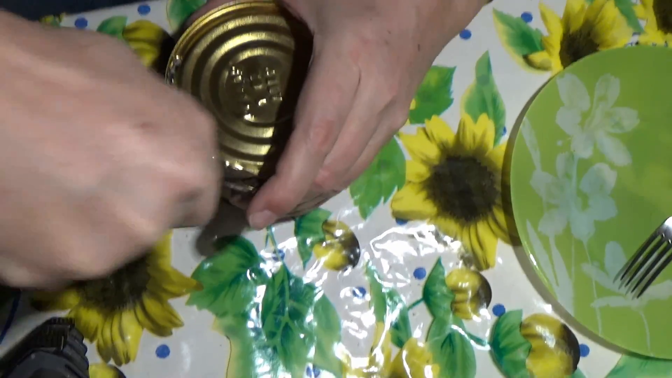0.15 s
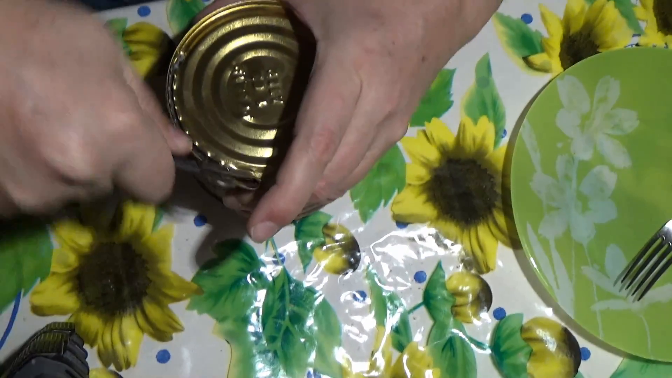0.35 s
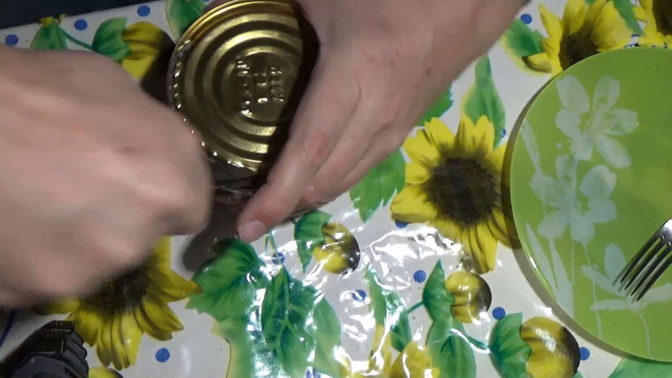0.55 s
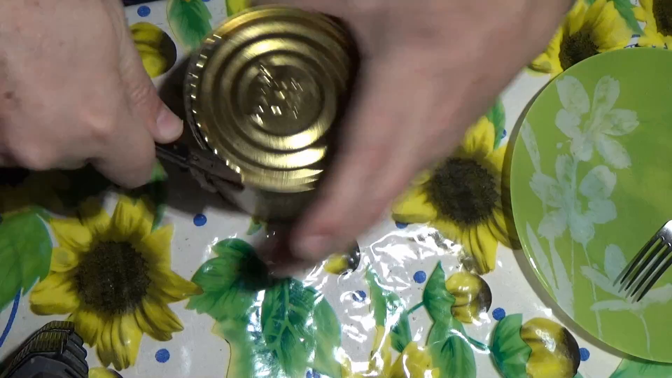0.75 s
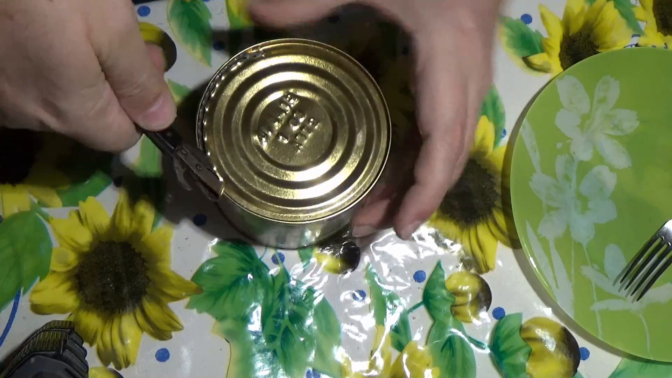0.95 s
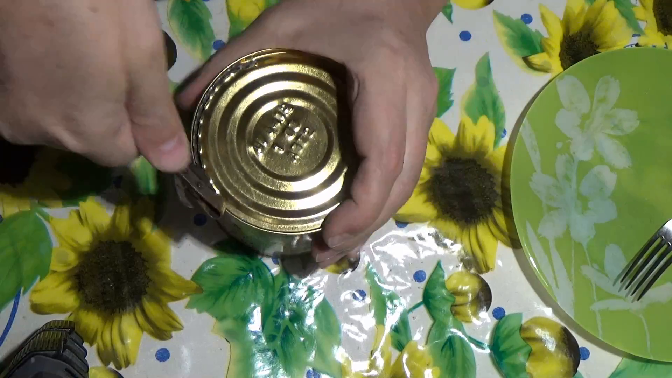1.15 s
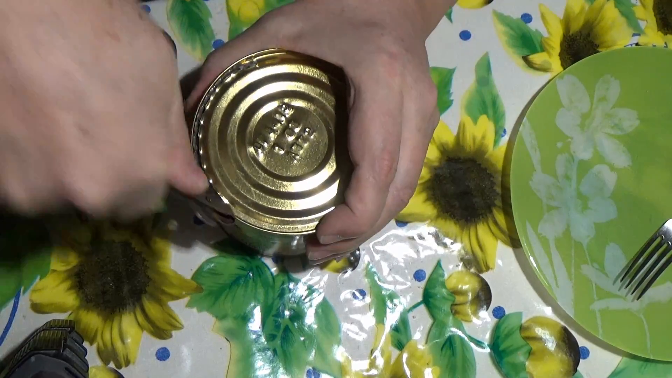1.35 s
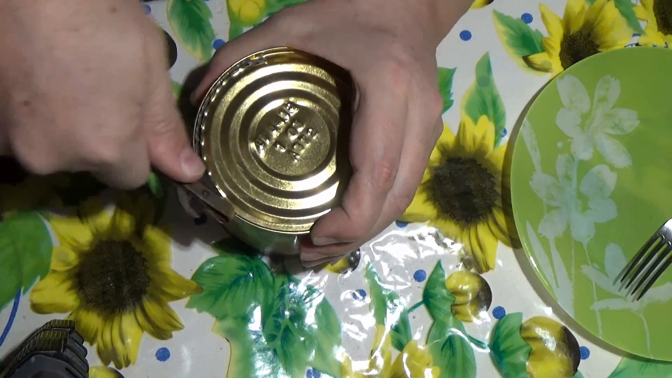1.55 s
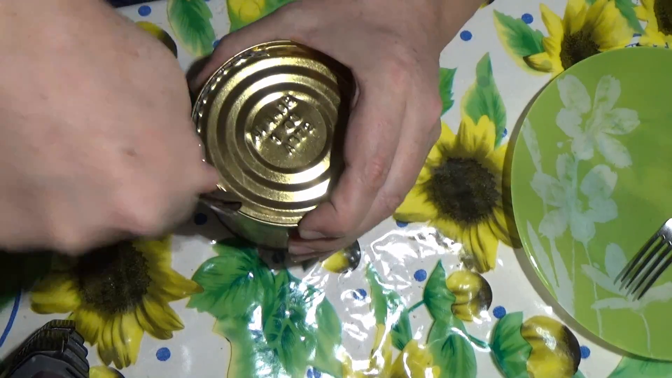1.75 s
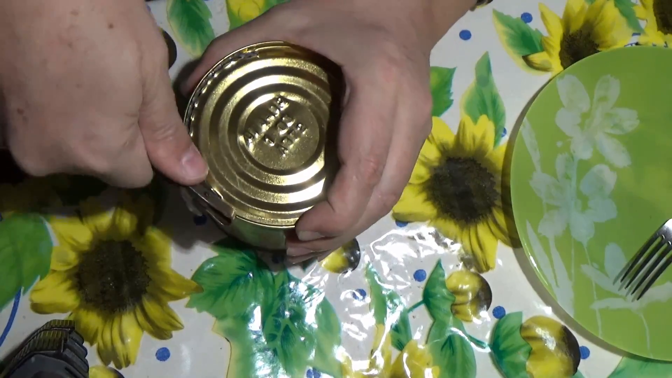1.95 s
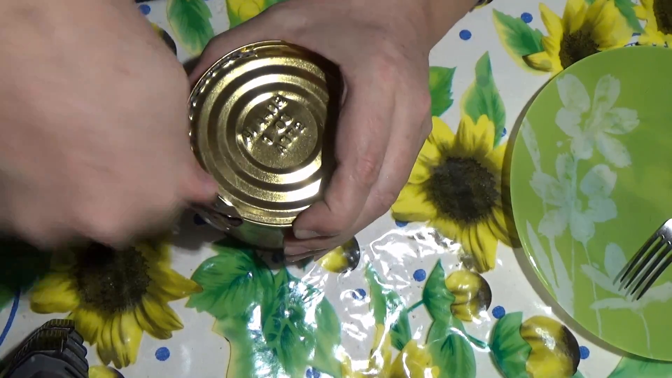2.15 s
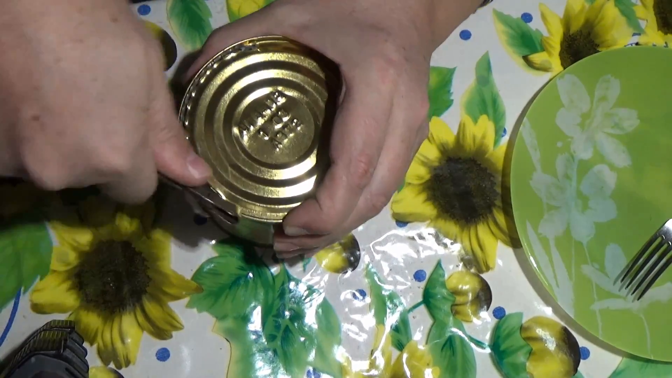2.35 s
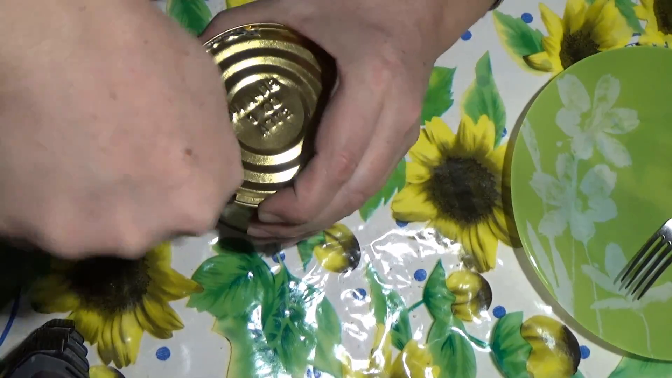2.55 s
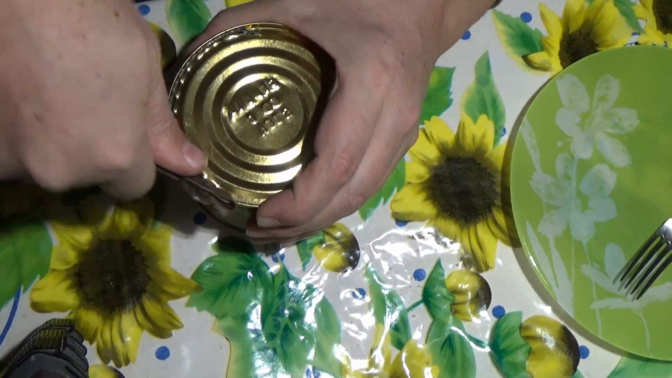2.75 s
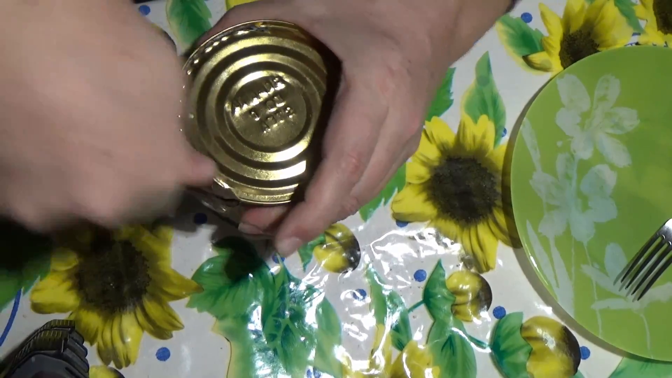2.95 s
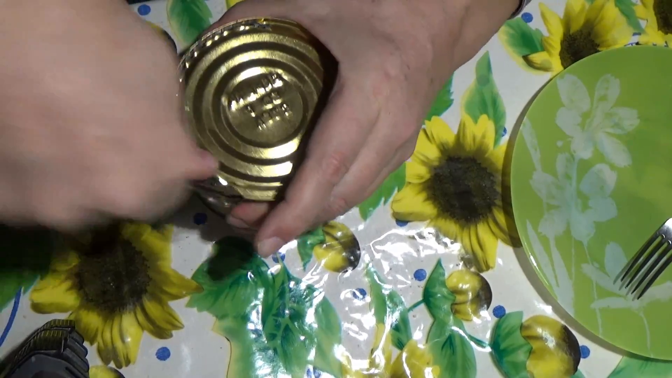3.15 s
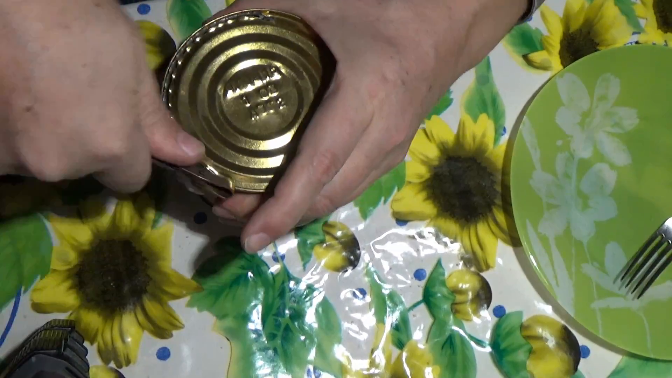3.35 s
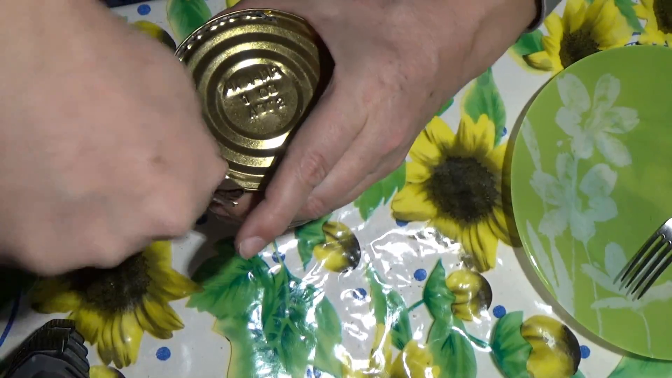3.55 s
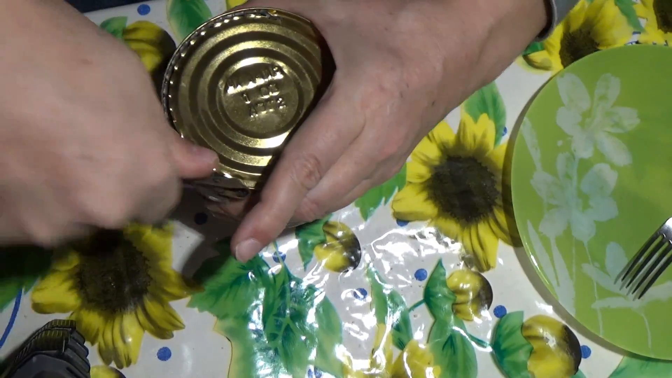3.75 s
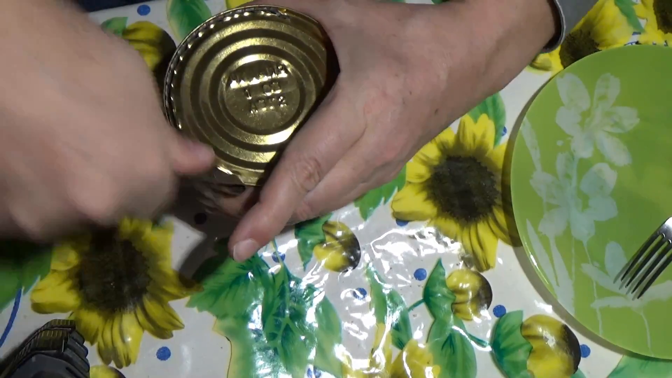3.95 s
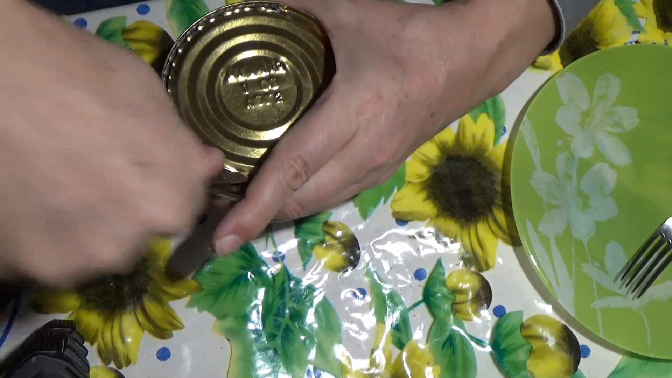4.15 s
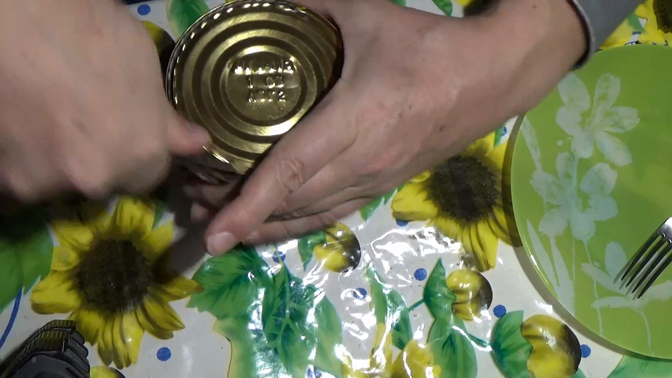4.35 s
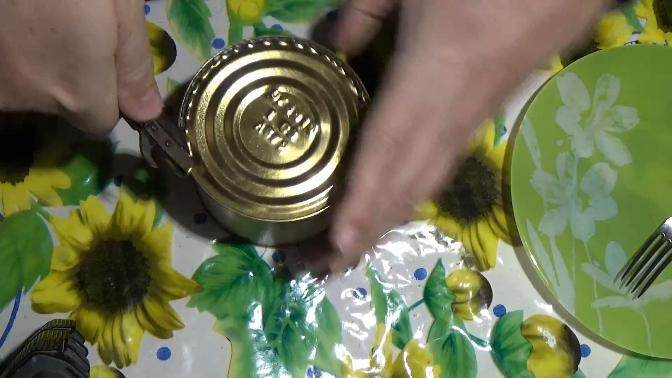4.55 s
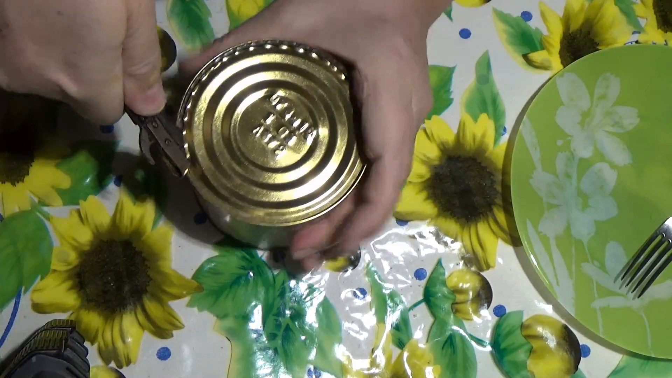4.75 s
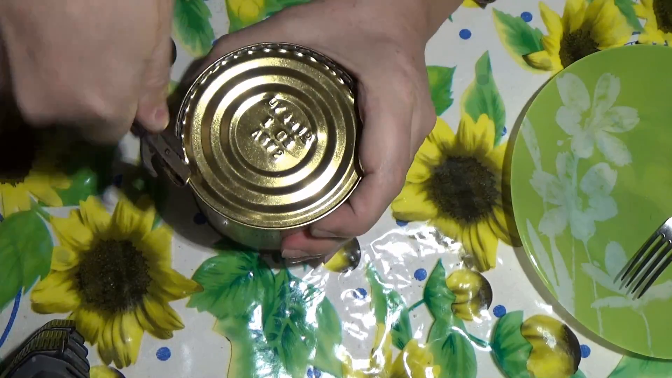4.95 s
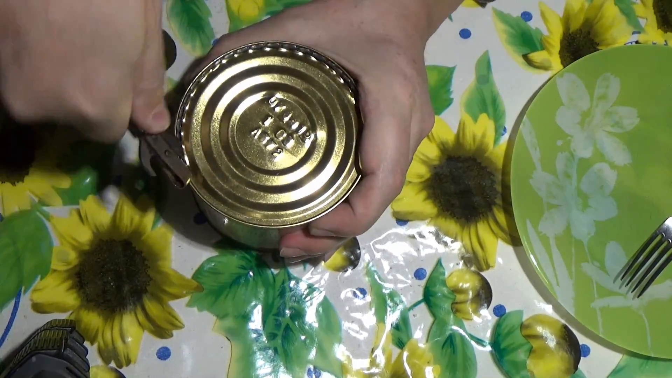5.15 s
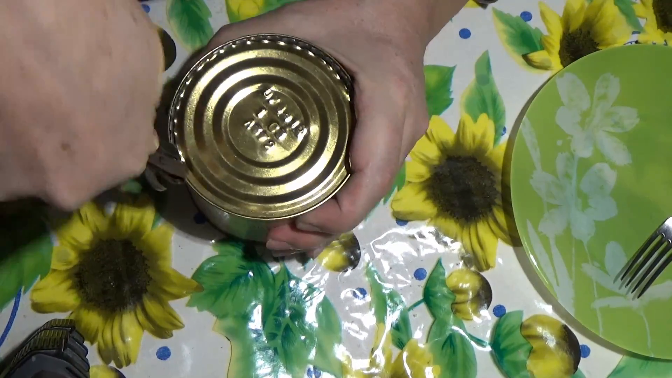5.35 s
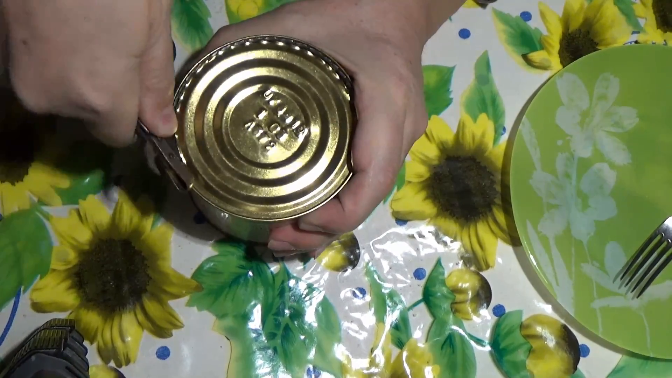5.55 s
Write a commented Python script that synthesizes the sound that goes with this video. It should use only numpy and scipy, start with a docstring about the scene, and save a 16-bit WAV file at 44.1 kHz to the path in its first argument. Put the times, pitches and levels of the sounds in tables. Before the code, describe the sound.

Heard very close in a quiet indoor room: gritty metallic strokes in uneven pairs, tearing forward and dragging back, each ringing the damped tin and shaking the table. Sharp clicks fall between them. Soft skin hiss marks two turns of the tin, the first followed by short low groans on the plastic cloth. More cutting follows, closing on a heavy crunching push and double jerk.

```python
"""A lever can opener works round a full tin on a table with a plastic cloth, heard close, almost in mono.
From the start, pushes tear the lid and shake the table; returns drag the blade along the rim.
Jerks, steel clicks and their pings fall between; after a few strokes the hand slides to turn the tin.
The tin then groans briefly on the cloth, and pushes and returns go on until the hand slides again.
More strokes follow, and a strong push with two hard jerks closes the scene over faint room noise."""
import sys
import numpy as np
from scipy import signal
from scipy.fft import rfft, irfft
from scipy.io import wavfile
from scipy.ndimage import uniform_filter1d

SR = 44100
rng = np.random.default_rng(int(sys.argv[2]) if len(sys.argv) > 2 else 0)


def store_pcm(level_fs):
    """Save levels as 16-bit WAV."""
    pcm = np.round(np.clip(level_fs, -1, 1) * 32767).astype(np.int16)
    wavfile.write(sys.argv[1], SR, np.atleast_2d(pcm).T)


N = 246959
TIME = np.arange(N) / SR
RING_TIME = TIME[:SR // 2]
STROKE_TIME = TIME[:SR * 3 // 5]

# Levels in these tables are relative: the functions below add their own gains.

# Room and microphone noise: [f/Hz, level/dB per Hz]
ROOM_NOISE = [(20, -28), (60, -22), (200, 5.5), (500, -10.5), (900, -1.5), (1600, -10), (2200, -11.5),
              (3000, -13.5), (6000, -12), (16000, -21)]
# Side sound against the middle: [f/Hz, level/dB]
STEREO_WIDTH = [(30, -20), (100, -23), (500, -23), (1800, -29), (5000, -24), (9000, -21), (15000, -17)]

# The hand slides while the tin is turned: [start t/s, swell t/s, hold t/s, fade t/s per 20 dB, level/dB]
HAND_SLIDES = [(0.744, 0.068, 0.12, 0.03, -42), (1.04, 0.12, 0.033, 0.5, -44.5),
               (4.405, 0.091, 0.095, 0.1, -42.5), (4.654, 0.12, 0.03, 0.3, -44.5)]
# Hiss of the sliding hand: [f/Hz, level/dB]
SLIDE_HISS = [(350, -50), (600, -4), (1490, -38), (1730, -28), (2310, -9), (2720, -8), (6030, 1),
              (12500, -4), (16000, -9.5)]

# The table frame: [f/Hz, level/dB per Hz]
FRAME_RUMBLE = [(15, -25), (35, -20), (80, -2.5), (115, 8), (170, -20), (400, -71)]
# The whole table takes a shove: [t/s, level/dB]
TABLE_SHOVES = [(.136, -39), (.655, -28), (1.764, -19.5), (1.895, -27), (2.679, -24), (3.206, -28.5),
                (5.5, -24.5)]
# The dull boom of a shove: [f/Hz, level/dB per Hz]
SHOVE_BOOM = [(20, -22), (55, -5.5), (120, 3), (220, -10), (600, -50)]
# The tin on the table top: [f/Hz, width f/Hz, level/dB]
TABLE_TONES = [(111.5, 12.6, -5.5), (181.7, 20, -0.5), (244.2, 24, 0), (304.4, 34, 2), (336, 30, -1.5)]
# The many weaker table tones: [f/Hz, level/dB per Hz]
TABLE_WEAK_TONES = [(30, -46), (70, -24), (110, -10), (145, -9.5), (230, 8.5), (380, -1), (550, -8.5),
                    (1000, -43)]
# The tin sticks and slips on the cloth: [start t/s, end t/s, start f/Hz, end f/Hz, level/dB]
CLOTH_GROANS = [(1.358, 1.439, 278, 222, -24.5), (1.434, 1.483, 236, 229, -32.5),
                (1.68, 1.738, 213.3, 245, -29.5)]

# The tin wall, shaken with the load: [f/Hz, width f/Hz, level/dB]
WALL_TONES = [(427, 76, -5), (587.5, 47, 1), (647, 70, -4.5), (718.5, 61, -2.5), (827, 12, -12.5),
              (882.2, 26, 2)]
# Two lid tones shift as the cut lengthens: [t/s, first f/Hz, level/dB, second f/Hz, level/dB]
LID_TONES = [(0, 1274, 2, 1530, -16), (1.8, 1252, 0.5, 1375, -5.5), (2.2, 1245, 0.5, 1520, -27),
             (2.6, 1163, 1.5, 1390, -32), (3.3, 1112, -2, 1398, -3.5), (3.9, 980, -58, 1435, 2.5),
             (5.6, 900, -50, 1397, 1)]
# Lid and rim: [f/Hz, width f/Hz, level/dB]
TIN_TONES = [(582.2, 27.6, 2), (700, 16, -14.5), (888.8, 25.3, 7), (949.4, 14.7, 2.5), (1048, 30, -4.5),
             (1157, 57, -1.5), (1380, 16.7, -25.5), (1681, 44, -6.5), (1866, 35.5, -5.5), (2004, 49, -0.5),
             (2123, 56, -9.5), (2260, 47, -7), (2400, 49, -6), (2629, 18, -6)]
# The many weaker tin tones: [f/Hz, level/dB per Hz]
TIN_WEAK_TONES = [(200, -40), (450, -3.5), (900, 1.5), (1300, 3.5), (1600, -15), (2200, 2), (2800, -11.5),
                  (4200, -14), (7000, -33)]
# The cut edge and the blade in it: [f/Hz, width f/Hz, level/dB]
EDGE_TONES = [(2210, 52, -9), (2440, 30, -14), (2750, 180, -19), (3027, 314, 10), (3427, 136, 11.5),
              (3960, 49, 12), (4730, 30, -32)]
# Bright crackle of the contact: [f/Hz, level/dB per Hz]
GRIT_CRACKLE = [(1000, 1), (2500, 2), (4000, 2), (6000, -0.5), (7200, -3), (10000, -5.5), (13000, -8),
                (16000, -22)]

# The steel blade and its hook: [f/Hz, width f/Hz, level/dB]
BLADE_TONES = [(1870, 220, -3), (2350, 300, 0), (3450, 420, -8), (4500, 700, -16), (5900, 600, -16)]
# Steel snapping against steel: [f/Hz, level/dB per Hz]
STEEL_SNAP = [(1000, -26), (2500, -9), (4000, 3), (5600, 4), (7200, -4.5), (10000, -3), (16000, -10.5)]
# The opener knocks on the rim:
# [t/s, peak level/dB, treble level/dB against the peak, tin ring level/dB, ping f/Hz]
RIM_CLICKS = [(0.084, -10.5, -33, -17.5, 2030), (0.419, -5.5, -21.5, -17.5, 2140),
              (0.56, -27.5, -18, -55, 5200), (1.031, -18, -16, -29.5, 2430), (1.322, -19, -24, -21, 2090),
              (2.464, -19, -29, -21, 2140), (2.584, -9.5, -27, -36, 2470), (2.825, -10, -27.5, -19.5, 2240),
              (3.151, -30, -6, -33, 2370), (3.191, -13.5, -21, -13.5, 2460), (3.53, -21, -3, -22.5, 2770),
              (3.767, -22.5, -12, -33, 2480), (3.923, -28.5, -18, -54, 5320), (4.102, -23, -28, -26, 2110),
              (4.149, -23.5, -27, -22, 2140), (4.524, -28, -12, -23, 2250), (4.646, -30.5, -4.5, -61, 4570),
              (4.675, -41, 2.5, -64, 5810), (4.815, -20, -1, -23, 2520), (4.95, -38.5, 2, -65, 10600)]
# The blade catches or the sheet gives way: [t/s, peak level/dB, table thump level/dB, treble level/dB]
BLADE_JERKS = [(0.134, -11.5, -45, -38), (0.647, -17, -23, -29), (0.691, -18, -40, -22),
               (0.709, -14, -28, -20), (1.207, -23.5, -35, -26.5), (1.267, -29, -26, -37),
               (1.357, -17.5, -33, -40), (1.684, -18, -45, -36), (1.764, -6.5, -24, -26.5),
               (1.771, -9.5, -36, -38), (1.889, -13, -42, -13.5), (1.9, -9, -45, -14),
               (2.119, -30, -37, -40.5), (2.18, -13.5, -42, -35), (2.505, -14, -39, -30),
               (2.515, -12.5, -36, -18.5), (2.672, -11.5, -19, -16), (2.685, -7, -27, -20),
               (3.505, -15, -47, -27), (4.818, -19.5, -31, -24), (5.326, -14, -42, -37),
               (5.495, -7.5, -11.5, -17), (5.506, -6, -23, -33)]
# The blade is levered through the lid: [start t/s, swell t/s, hold t/s, fade t/s per 20 dB,
# table load level/dB, rasp level/dB, grit level/dB, singing level/dB]
BLADE_PUSHES = [(-0.031, 0.027, 0.013, 0.07, -30.5, -28, -38, -41.5),
                (0.075, 0.011, 0.057, 0.07, -37.5, -34.5, -50, -53.5),
                (0.271, 0.035, 0.049, 0.08, -26.5, -29.5, -36.5, -32.5),
                (0.599, 0.095, 0.011, 0.0839, -35.0, -31, -37.5, -40.5),
                (1.138, 0.062, 0.0061, 0.05, -35.5, -36.5, -47, -55),
                (1.233, 0.026, 0.003, 0.22, -36.0, -46, -51, -55.5),
                (1.518, 0.043, 0.028, 0.095, -28.5, -30.0, -35.5, -43),
                (1.757, 0.007, 0.014, 0.08, -28.5, -17.5, -49, -35.5),
                (1.836, 0.024, 0.005, 0.03, -39, -31, -44.5, -55),
                (1.874, 0.018, 0.005, 0.07, -26.5, -21.5, -31.5, -33),
                (1.922, 0.023, 0.008, 0.01, -42.0, -35.5, -42, -49.0),
                (2.279, 0.071, 0.059, 0.01, -32.5, -27, -37.5, -38.5),
                (2.63, 0.066, 0.032, 0.114, -29, -26.5, -36.5, -33),
                (2.967, 0.063, 0.053, 0.07, -31, -28.5, -38.5, -39.5),
                (3.277, 0.071, 0.044, 0.08, -31, -29, -37.5, -38.5),
                (3.147, 0.0073, 0.028, 0.06, -44, -40, -48.5, -52),
                (3.446, 0.025, 0.016, 0.14, -44, -39.0, -44.0, -41),
                (3.618, 0.065, 0.036, 0.1, -28.5, -29.5, -38, -39.5),
                (3.954, 0.057, 0.037, 0.0637, -30.5, -27.5, -36.0, -43.5),
                (4.312, 0.034, 0.05, 0.06, -39.5, -34.5, -40.5, -42),
                (4.802, 0.017, 0.004, 0.08, -33, -31, -40, -52),
                (5.123, 0.042, 0.048, 0.07, -35.0, -33.0, -43.0, -42.0),
                (5.388, 0.016, 0.066, 0.15, -38.5, -43.5, -55.0, -53.0),
                (5.463, 0.048, 0.016, 0.16, -24.0, -25.0, -36.5, -31.5)]
# The blade slides back along the rim: [start t/s, swell t/s, hold t/s, fade t/s per 20 dB,
# table load level/dB, rasp level/dB, grit level/dB, singing level/dB]
BLADE_RETURNS = [(0.121, 0.008, 0.034, 0.0849, -32.5, -27.5, -38.5, -30),
                 (0.412, 0.011, 0.089, 0.09, -36.5, -30.5, -41, -47),
                 (1.34, 0.022, 0.013, 0.11, -31, -28.5, -39, -46),
                 (1.672, 0.032, 0.016, 0.09, -35, -26.5, -39.5, -39),
                 (2.158, 0.033, 0.04, 0.08, -37.5, -26, -38.5, -31),
                 (2.483, 0.042, 0.042, 0.04, -38, -22.5, -35.5, -30.5),
                 (2.819, 0.073, 0.016, 0.059, -44, -26.5, -39.0, -41),
                 (3.186, 0.0087, 0.037, 0.062, -41, -23.5, -36, -34.5),
                 (3.499, 0.0091, 0.046, 0.09, -44.5, -30.5, -40.0, -37.5),
                 (3.779, 0.019, 0.07, 0.0639, -50.0, -33.5, -42.5, -37.0),
                 (4.141, 0.061, 0.021, 0.05, -49.0, -31, -42.5, -39.0),
                 (4.521, 0.0042, 0.013, 0.03, -49.0, -38.5, -48, -49.5),
                 (4.988, 0.058, 0.02, 0.04, -44, -31.5, -45.5, -38),
                 (5.313, 0.017, 0.05, 0.056, -48.0, -27.5, -43.5, -37.0)]

# How far below full force each kind of movement sets in
PUSH_ENTRY_DB, RETURN_ENTRY_DB, SLIDE_ENTRY_DB = 22.5, 14.5, 15
# How a movement eases off while held
EASING_DB_PER_S = 26.5
# The light rub left after a movement: its relative level and its fall
LINGER_DB, LINGER_DB_PER_S = -13.5, 100
# The load outlasts the rasp, and the singing tone answers late
LOAD_OUTLASTS_S, SINGING_LAG_S = 0.016, 0.0088
# Grit needs pressure: it grows as this power of the force
GRIT_POWER = 1.11
# The frame rumbles with the load (relative level) and under the resting hands
RUMBLE_SHARE_DB, RESTING_DB = -17.5, -67
# A ping has one overtone: its frequency ratio and relative level
PING_OVERTONE, PING_OVERTONE_DB = 1.41, -4.5


def from_db(db):
    """Turn decibels into a gain."""
    return 10 ** (np.asarray(db) / 20)


def unit(response):
    """Scale a response to energy 1, so that it keeps the level of noise passing through."""
    return response / np.sqrt(np.sum(response ** 2) + 1e-20)


def through(force, response):
    """Let a force set off a response at every moment."""
    return signal.fftconvolve(force, response)[:N]


def colour(x, spectrum):
    """Weight each frequency by a curve drawn through the given points."""
    hz, db = np.transpose(spectrum)
    grid = np.maximum(np.fft.rfftfreq(len(x), 1 / SR), 1)
    curve_db = np.interp(np.log(grid), np.log(hz), db)
    return irfft(rfft(x) * from_db(curve_db), len(x))


def noise(spectrum):
    """Steady coloured noise, rms 1."""
    x = colour(rng.standard_normal(N), spectrum)
    return x / x.std()


def drift(rate_hz):
    """Slow random wandering, spread 1."""
    r = np.exp(-2 * np.pi * rate_hz / SR)
    x = signal.lfilter([1], [1, -2 * r, r * r], rng.standard_normal(N))
    return x / x.std()


def impulses(s, db):
    """Put one single-sample tap of the given level at each time."""
    out = np.zeros(N)
    places = np.clip(np.round(s * SR).astype(int), 0, N - 1)
    np.add.at(out, places, from_db(db))
    return out


def blows(s, db, chatter_s):
    """A hard contact is a first touch and a few milliseconds of chatter."""
    t = TIME[:SR // 60]
    bursts = rng.standard_normal((len(s), len(t))) * np.exp(-t / chatter_s)
    touch = signal.unit_impulse(len(t))
    out = np.zeros(N)
    for at, gain, burst in zip(np.round(s * SR).astype(int), from_db(db), bursts):
        out[at:at + len(t)] += gain * unit(unit(burst) + touch)
    return out


def modes(table):
    """Solid things ring in fading tones; the wider a tone, the sooner it dies."""
    t = RING_TIME
    ring = 0
    for k, (hz, width, db) in enumerate(table):
        sign = (-1) ** k
        ring = ring + sign * from_db(db) * width * np.exp(-np.pi * width * t) * np.cos(2 * np.pi * hz * t)
    return unit(ring)


def wash(spectrum, t60):
    """Many overlapping weak tones ring like fading noise, down 60 dB after t60 seconds."""
    return unit(noise(spectrum)[:len(RING_TIME)] * from_db(-60 * RING_TIME / t60))


def crack(spectrum):
    """Sound straight from the contact is a sharp pulse, with all its energy as early as possible."""
    count = len(RING_TIME)
    pulse = colour(signal.unit_impulse(count), spectrum)
    cepstrum = irfft(np.log(abs(rfft(pulse)) + 1e-9), count)
    # Keeping only the first half of the cepstrum makes the pulse start at once.
    return unit(irfft(np.exp(2 * rfft(cepstrum[:count // 2], count)), count))


def wandering(force, spectrum, t60, move_hz):
    """As the contact point moves, other weak tones take over: no two bites ring alike."""
    shares = np.array([drift(move_hz) for _ in range(6)])
    shares /= np.sqrt(np.sum(shares ** 2, axis=0))
    return sum(through(force * share, wash(spectrum, t60)) for share in shares)


def envelope(swell, hold, fade, entry_db):
    """A hand movement sets in softly, swells, eases off a little and dies away to a light rub."""
    t = STROKE_TIME
    rising_db = entry_db * np.clip(1 - t / swell, 0, 1) ** 2
    easing_db = EASING_DB_PER_S * np.clip(t - swell, 0, hold)
    after = np.clip(t - swell - hold, 0, 1)
    lifting_db = 20 * (after / .25) ** 4
    rub_db = LINGER_DB_PER_S * after - LINGER_DB + lifting_db
    fading_db = np.minimum(20 * after / fade, rub_db)
    return from_db(-rising_db - easing_db - fading_db)


def placed(shape, start):
    """Lay a movement's envelope into the scene at its start time."""
    return np.interp(TIME, start + STROKE_TIME, shape, left=0, right=0)


def background_noise():
    """The room and the microphone give a faint steady noise."""
    return from_db(-53.5) * noise(ROOM_NOISE)


def hand():
    """Skin sliding over tin and plastic cloth hisses softly."""
    gain = np.zeros(N)
    for start, swell, hold, fade, db in HAND_SLIDES:
        gain += placed(from_db(db) * envelope(swell, hold, fade, SLIDE_ENTRY_DB), start)
    return gain * noise(SLIDE_HISS) * from_db(-3.5 + 2.0 * drift(60))


def table_top(force, leaning):
    """The tin shakes the table under it; the frame rumbles with the load and booms when shoved."""
    ring = from_db(-2) * modes(TABLE_TONES) + from_db(-7.5) * crack(TABLE_WEAK_TONES)
    weak = from_db(-11) * wandering(force, TABLE_WEAK_TONES, t60=0.18, move_hz=3.3)
    rumble = (from_db(RUMBLE_SHARE_DB) * leaning + from_db(RESTING_DB)) * noise(FRAME_RUMBLE)
    s, db = np.transpose(TABLE_SHOVES)
    boom = through(impulses(s, db + 15.5), crack(SHOVE_BOOM))
    return through(force, ring) + weak + rumble + boom


def groans():
    """The tin slips on the cloth at a regular rate: a short low tone swells, glides and fades."""
    out = np.zeros(N)
    for start, end, start_hz, end_hz, db in CLOTH_GROANS:
        progress = np.clip((TIME - start) / (end - start), 0, 1)
        phase = 2 * np.pi * np.cumsum(start_hz + (end_hz - start_hz) * progress) / SR
        tone = np.sin(phase) + from_db(-20) * np.sin(3 * phase)
        out += from_db(db) * np.sin(np.pi * progress) * tone
    return out


def wall(load, rasp):
    """The tin wall answers only when the blade both bears down and rasps."""
    force = np.sign(rasp) * np.sqrt(abs(load * rasp))
    return from_db(-1.5) * through(force, modes(WALL_TONES))


def lid(force, width_hz):
    """The lid rings in two moving tones, often only one of them loud, retuned as more of it comes free."""
    s, *columns = np.transpose(LID_TONES)
    r = np.exp(-np.pi * width_hz / SR)
    out = 0
    for hz, db in zip(columns[::2], columns[1::2]):
        # A resonator that turns with the moving pitch.
        turn = np.exp(2j * np.pi * np.cumsum(np.interp(TIME, s, hz)) / SR)
        ring = turn * signal.lfilter([1], [1, -r], force / turn + 1e-18)
        out = out + from_db(np.interp(TIME, s, db)) * ring.real * np.sqrt(2 * (1 - r * r))
    return out


def tin(force):
    """Lid and rim ring briefly, damped by the contents and the hand."""
    ring = from_db(-2.8) * modes(TIN_TONES) + from_db(-11) * crack(TIN_WEAK_TONES)
    weak = from_db(-9) * wandering(force, TIN_WEAK_TONES, t60=.1, move_hz=4)
    return through(force, ring) + weak + from_db(-8.5) * lid(force, width_hz=35)


def singing(gain, hz, waver_hz, waver_db):
    """Friction keeps one tone near 510 Hz going; its pitch wavers with the grip, and its level wavers too."""
    phase = 2 * np.pi * np.cumsum(hz + waver_hz * drift(28.2)) / SR
    return gain * from_db(waver_db * drift(45)) * np.sqrt(2) * np.sin(phase)


def cut_edge(rasp, grit):
    """The torn edge rings as the blade rubs it, under the bright crackle of the contact."""
    rubbing = np.sign(rasp) * np.sqrt(abs(rasp * grit))
    ring = from_db(-7) * through(rubbing, modes(EDGE_TONES))
    direct = through(grit, crack(GRIT_CRACKLE))
    weak = wandering(grit, GRIT_CRACKLE, t60=0.053, move_hz=5.5)
    return ring + direct + weak


def pings():
    """Each point of contact has a short, dry steel ping of its own."""
    t, out = TIME[:SR // 20], np.zeros(N)
    fade = from_db(-60 * t / .018)
    for s, peak_db, _, _, hz in RIM_CLICKS:
        start, phase = round(s * SR), 2 * np.pi * hz * t
        tone = np.sin(phase) + from_db(PING_OVERTONE_DB) * np.sin(PING_OVERTONE * phase)
        out[start:start + len(t)] += from_db(peak_db) * fade * tone
    return out


def friction(per_s, spread_db, judder_db, judder_hz, smooth_db):
    """Tiny slips of uneven size, bunched by the judder of the blade, lie over a smooth rub."""
    happens = rng.random(N) < per_s / SR
    size_db = spread_db * np.minimum(rng.exponential(1, N), 3)
    slips = happens * rng.choice([-1, 1], N) * from_db(size_db)
    rub = from_db(smooth_db) * rng.standard_normal(N)
    force = (slips / slips.std() + rub) * from_db(judder_db * drift(judder_hz))
    # Even out the slower level changes, to a running rms of 1.
    return force / np.sqrt(uniform_filter1d(force ** 2, size=1024) + 1e-9)


def efforts(rows, entry_db):
    """The hand sets load, rasp, grit and singing over time; where strokes overlap, the stronger counts."""
    gains = np.zeros((4, N))
    for start, swell, hold, fade, load_db, rasp_db, grit_db, singing_db in rows:
        rubbing = envelope(swell, hold, fade, entry_db)
        bearing = envelope(swell, hold + LOAD_OUTLASTS_S, fade, entry_db)
        stroke = [placed(from_db(load_db) * bearing, start),
                  placed(from_db(rasp_db) * rubbing, start),
                  placed(from_db(grit_db) * rubbing ** GRIT_POWER, start),
                  placed(from_db(singing_db) * rubbing, start + SINGING_LAG_S)]
        gains = np.maximum(gains, stroke)
    return uniform_filter1d(gains, size=192, axis=1)


def stroke_forces(effort, slips, split_hz, softening):
    """A lightly loaded blade only skims the sheet: its rasp loses the lower notes."""
    load, rasp, grit, _ = effort
    bearing = np.clip((load + 1e-6) / (rasp + 1e-6), .03, 1.5) ** softening
    low = signal.sosfiltfilt(signal.butter(2, split_hz, fs=SR, output="sos"), slips)
    shaped = slips - low + from_db(2) * bearing * low
    on_table = from_db(-1.5) * load * slips
    on_tin = from_db(-0.21) * rasp * shaped
    on_edge = from_db(-0.06) * grit * slips
    return np.array([on_table, on_tin, on_edge])


def strokes(pushing, returning):
    """The working blade tears on a push and drags on a return, forcing table, tin and cut edge."""
    tear = friction(per_s=700, spread_db=3.5, judder_db=2.4, judder_hz=110, smooth_db=-8.5)
    drag = friction(per_s=1500, spread_db=3.4, judder_db=1.8, judder_hz=142, smooth_db=-5.5)
    push = stroke_forces(pushing, tear, split_hz=770, softening=0.24)
    back = stroke_forces(returning, drag, split_hz=1130, softening=0.4)
    return push + back


def opener():
    """Strokes, jerks and clicks drive the same tin; strokes and jerks shake the table, clicks ring the blade."""
    pushing = efforts(BLADE_PUSHES, PUSH_ENTRY_DB)
    returning = efforts(BLADE_RETURNS, RETURN_ENTRY_DB)
    leaning, _, _, bowing = pushing + returning
    load, rasp, grit = strokes(pushing, returning)

    s, peak_db, thump_db, treble_db = np.transpose(BLADE_JERKS)
    load = load + impulses(s, thump_db + 23)
    rasp = rasp + blows(s, peak_db + 16.5, chatter_s=0.0037)
    grit = grit + blows(s, treble_db + 13, chatter_s=0.0066)

    s, peak_db, bright_db, ring_db, _ = np.transpose(RIM_CLICKS)
    rasp = rasp + blows(s, ring_db + 16.5, chatter_s=0.0021)
    snap = through(blows(s, peak_db + bright_db + 21, chatter_s=0.0046), crack(STEEL_SNAP))
    blade = through(blows(s, peak_db + 4.5, chatter_s=0.0018), modes(BLADE_TONES))
    blade = blade + from_db(-10) * pings()

    body = table_top(load, leaning) + wall(load, rasp) + tin(rasp) + cut_edge(rasp, grit)
    song = singing(bowing, hz=508.7, waver_hz=7.84, waver_db=3.5)
    return body + snap + blade + song + groans()


def scene():
    """The work sounds from the middle; a faint room tail and a little width surround it."""
    near = opener() + hand()
    # Room tail: [f/Hz, level/dB]
    room = wash([(50, 16), (200, -11), (2000, -11), (6000, 13.5), (16000, -5)], t60=0.34)
    mid = near + from_db(-23) * through(near, room) + background_noise()
    spread = wandering(mid, [(50, 0), (16000, 0)], t60=.02, move_hz=5)
    side = colour(spread, STEREO_WIDTH)
    return np.array([mid + side, mid - side])


def record(dry):
    """The microphone thins the deep bass; the top is cut steeply."""
    bass_cut = signal.butter(2, 42, "high", fs=SR, output="sos")
    top_cut = signal.ellip(12, .1, 80, 16100, fs=SR, output="sos")
    return signal.sosfilt(top_cut, signal.sosfilt(bass_cut, dry))


dry = scene()
out = record(dry)
store_pcm(out)
```